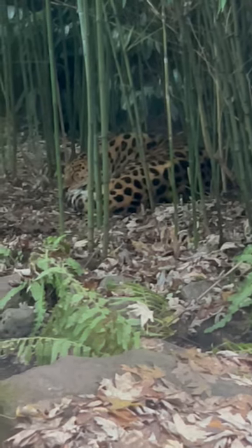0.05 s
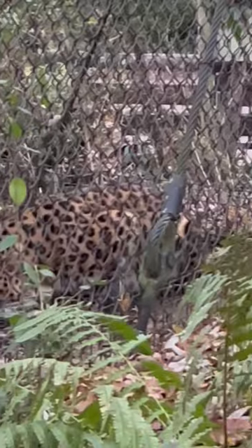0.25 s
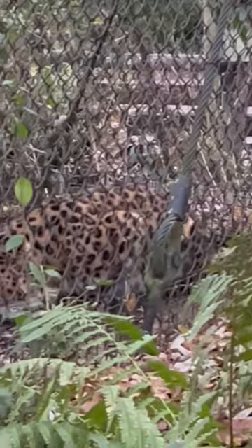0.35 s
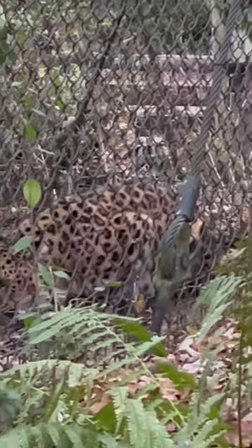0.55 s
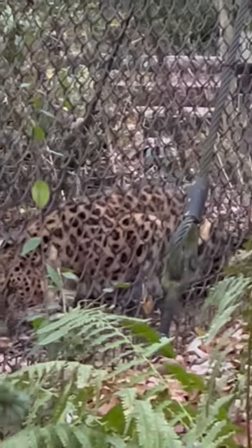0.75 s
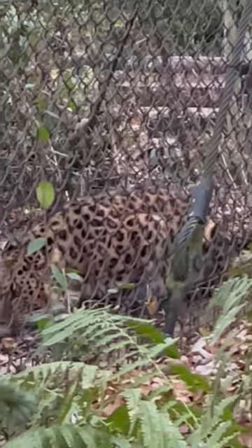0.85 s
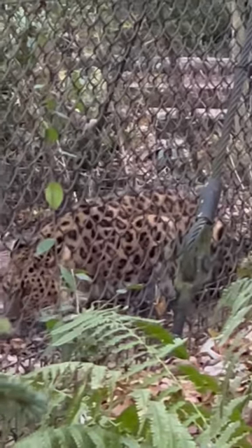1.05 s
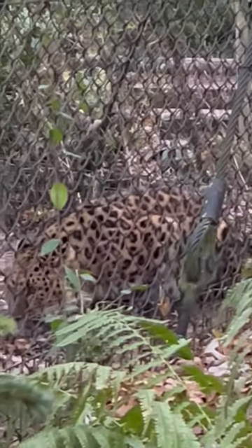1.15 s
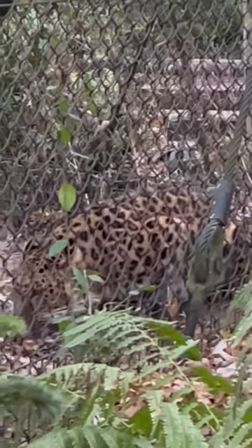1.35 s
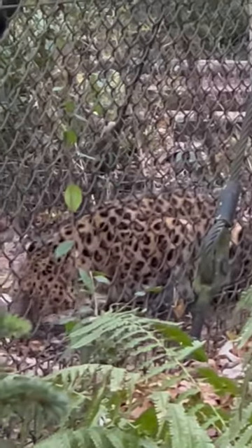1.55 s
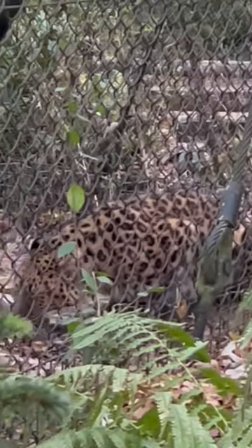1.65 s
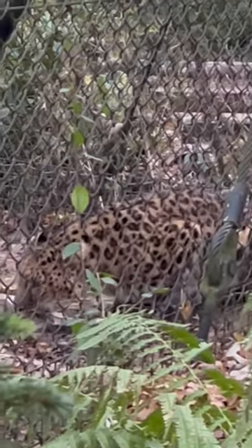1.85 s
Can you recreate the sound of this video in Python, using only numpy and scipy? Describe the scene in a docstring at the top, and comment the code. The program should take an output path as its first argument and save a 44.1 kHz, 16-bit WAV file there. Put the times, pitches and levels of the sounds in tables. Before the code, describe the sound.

A leopard gives three short, low rasps, the last two each led by a softer indrawn one. A small bird to the right sings thin buzzing notes ending in a whistle, over faint outdoor hiss and ticking dry leaves.

```python
"""A faint outdoor hiss and rumble come first, with a far bird's falling chirp and ticking dry leaves.
Then a leopard saws: three low rasps, the last two each led by a softer indrawn rasp. Its slack vocal
folds flap slowly, and each flap excites the resonances of the long throat. A nearer bird in the
trees gives thin notes over a buzz that ends in a slurred whistle."""
import sys
import numpy as np
from scipy import signal
from scipy.fft import rfft, irfft
from scipy.io import wavfile
from scipy.ndimage import uniform_filter1d

SR = 44100
rng = np.random.default_rng(int(sys.argv[2]) if len(sys.argv) > 2 else 0)


def generate_wav(signal):
    """Clip the signal to [-1, 1] and save it as 16-bit WAV at the path in sys.argv[1]."""
    frames = np.transpose(np.atleast_2d(signal))
    scaled = np.clip(frames, -1, 1) * 32767
    pcm = np.round(scaled).astype(np.int16)
    wavfile.write(sys.argv[1], SR, pcm)


N = 83790
T = np.arange(N) / SR
FREQS = np.fft.rfftfreq(N, 1 / SR)


def amp(db):
    """Amplitude ratio of a level; all levels here are relative."""
    return 10 ** (np.asarray(db) / 20)

def unit(x):
    """Normalisation to rms 1."""
    return x / np.sqrt(np.mean(x ** 2) + 1e-20)

def over_frequency(points):
    """Interpolation of (f/Hz, value) points on a logarithmic frequency axis."""
    hz, value = np.transpose(points)
    return np.interp(np.log(FREQS + 1), np.log(hz + 1), value)

def colour(x, gains):
    """Linear filtering by an (f/Hz, gain/dB) curve."""
    return irfft(rfft(x) * amp(over_frequency(gains)), N)

def wander(hz):
    """Random fluctuation: low-pass noise of rms 1."""
    return unit(irfft(rfft(rng.standard_normal(N)) * np.exp(-(FREQS / hz) ** 2), N))


# Coherence between the ears: f/Hz, coherence
COHERENCE = [(50, 1), (200, 0.48), (600, 0.45), (1500, 0.41), (4000, 0.17), (15000, 0.36)]

def outdoor_noise(spectrum):
    """Partial coherence: the ears receive nearly the same noise only at long wavelengths."""
    left, independent = rfft(rng.standard_normal((2, N)))
    coherence = over_frequency(COHERENCE)
    right = coherence * left + np.sqrt(1 - coherence ** 2) * independent
    return unit(colour(irfft(np.array([left, right]), N), spectrum))

# Spectra of the hiss and the rumble: f/Hz, level/dB
HISS_SPECTRUM = [(20, -36), (70, -8), (130, 0), (200, -2), (330, -5), (520, -6.5), (1200, -10.5),
                 (2000, -11), (3100, -8.5), (4200, -12), (6300, -17), (10000, -20.5), (13500, -23),
                 (15700, -29)]
RUMBLE_SPECTRUM = [(15, -22), (35, -22), (55, -6), (85, -4.5), (120, -6), (190, -60), (500, -62)]
# Envelope of the rumble: t/s, level/dB
RUMBLE_ENVELOPE = [(0, -51.5), (.15, -49), (.38, -57.5), (.6, -49), (.95, -61), (1.27, -49.5), (1.7, -63.5),
                   (1.85, -56.5)]

def background():
    """Amplitude-modulated noise: a faint hiss of foliage and an uneven distant rumble."""
    hiss = outdoor_noise(HISS_SPECTRUM) * amp(-44.93 + .5 * wander(6.6) + amp(-15) * wander(120))
    rumble = outdoor_noise(RUMBLE_SPECTRUM) * amp(np.interp(T, *np.transpose(RUMBLE_ENVELOPE)))
    return hiss + rumble


BUZZ_HZ, TRILL_HZ = 100, 160  # modulation rates

def warble(curve, rate_hz, swing_hz, wander_hz):
    """Frequency modulation: a tone shakes quickly about a (t/s, f/Hz, level/dB) curve."""
    times, hz, db = np.transpose(curve)
    shake = np.sin(2 * np.pi * np.cumsum(rate_hz * (1 + .14 * wander(63.3))) / SR)
    pitch = np.interp(T, times, hz) + swing_hz * shake + wander_hz * wander(148.2)
    gate = np.clip(np.minimum(T - times[0], times[-1] - T) / .0043, 0, 1)
    return np.sqrt(2) * gate * amp(np.interp(T, times, db)) * np.sin(2 * np.pi * np.cumsum(pitch) / SR)

def echoes(x, t60):
    """Scattering from stems, fence and ground: an exponential decay, different at each ear."""
    t = T[:SR]
    taps = rng.standard_normal((2, SR)) * (rng.random((2, SR)) < .1)
    taps *= np.exp(-np.log(1000) * t / t60) * np.minimum(t / .0014, 1)
    taps = taps + .21 * taps[::-1]  # the ears share a part
    return signal.fftconvolve(x[None], taps / np.linalg.norm(taps[0]), axes=1)[:, :N]

def tree_echoes(song):
    """Reverberation among the trees, slightly stronger on the right."""
    return echoes(song, t60=.69) * amp([[-.5], [.5]])

# A falling chirp and its hoarse ending: t/s, f/Hz, level/dB
CHIRP_CURVE = [(.055, 4600, -50), (.076, 3800, -45.5), (.092, 3430, -52), (.118, 3220, -49),
               (.16, 3010, -55), (.175, 3030, -63)]
CHURR_CURVE = [(.21, 2400, -58), (.25, 2630, -58), (.278, 2753, -46.5), (.32, 2706, -66)]

def far_bird():
    """Direct-to-reverberant ratio: from far off, the echoes outweigh the call itself."""
    call = warble(CHIRP_CURVE, TRILL_HZ, swing_hz=30, wander_hz=30.3)
    call += warble(CHURR_CURVE, TRILL_HZ, swing_hz=266, wander_hz=143)
    return amp(-8) * call + amp(-1) * tree_echoes(call)


# Ticks of dry leaves: t/s, level/dB
LEAF_TICKS = [(0.148, -56.5), (.366, -57), (.58, -53.5), (0.593, -58), (.851, -53), (1.028, -55),
              (1.243, -52), (1.259, -73), (1.46, -55.5), (1.6, -57.5)]
# Their spectrum: f/Hz, level/dB
LEAF_SPECTRUM = [(1000, -32), (3000, -19), (8000, 11.5), (13000, 6), (15000, 1), (16000, -12)]

def leaves(snap_s=.002, crumple_s=.017):
    """Noise transients with two exponential decays: each leaf snaps and crumples briefly."""
    envelope = np.zeros(N)
    for start, db in LEAF_TICKS:
        age = np.maximum(T - start, 0)
        envelope += (T >= start) * amp(db) * (np.exp(-age / snap_s) + amp(2) * np.exp(-age / crumple_s))
    grain = rng.standard_normal((2, N)) + 2.5 * rng.standard_normal(N)
    return envelope * unit(colour(grain, LEAF_SPECTRUM)) * amp([[-1.5], [3]])


def vocal_folds(flap_times, strength, echo_s, turbulence, puff_s=.0065):
    """Glottal pulse source: each strike of the folds returns as a weaker echo about 4 ms later, and the folds
    release puffs of turbulent air."""
    pulses = np.zeros(N)
    for delay, gain in [(0, 1), (echo_s, amp(-4.5))]:
        pulses[np.clip(((flap_times + delay) * SR).astype(int), 0, N - 1)] += gain * strength
    puff = np.exp(-T[:SR // 20] / puff_s)
    air = signal.fftconvolve(pulses, puff / np.linalg.norm(puff))[:N] * rng.standard_normal(N)
    return (1 - turbulence) * pulses + turbulence * air

def resonate(x, hz, width_hz):
    """Double-pole resonance of gain 1, whose centre frequency can move."""
    carrier = np.exp(2j * np.pi * np.cumsum(hz * np.ones(N)) / SR)
    r = np.exp(-np.pi * width_hz / SR)
    return 2 * (carrier * signal.lfilter([(1 - r) ** 2], [1, -2 * r, r * r], x / carrier + 1e-18)).real

# Upper throat formants, before each rasp scales them: f/Hz, bandwidth/Hz, gain/dB
FORMANTS = [(704.7, 111, -7), (779, 85, -16.5), (1050, 176, -20), (1446, 330, -25.5), (1686, 190, -28),
            (2170, 220, -27.5), (2680, 600, -35)]
# Soft thud under each flap: f/Hz, gain/dB
THUD_SPECTRUM = [(30, -46), (60, -20), (90, -16), (125, -28), (170, 1), (260, -38), (450, 5), (1500, -57)]
REST_HZ, LOW_WIDTH_HZ = 276, 139.4  # the lowest formant, likewise unscaled

def rasp(peak, rise, fall, db, rate, low_hz, upper_db, rise_power, fall_power, alternate_db, push_lag,
         tilt_db, damping, jitter, turbulence):
    """Source-filter principle: a swelling and fading train of slow flaps rings the throat."""
    k = np.arange(-12, 13)  # flaps, counted from the peak
    slip, shimmer, snap, late = rng.standard_normal((4, len(k)))
    spread = 1 + 12 * (k / rate) ** 2  # flaps space out away from the peak
    flap_times = peak + (k + jitter * slip) / rate * spread
    arch = np.sin(np.pi / 2 * np.interp(T, [peak - rise, peak, peak + fall], [0, 1, 0]))
    effort = arch ** np.where(T < peak, rise_power, fall_power)
    strength = np.interp(flap_times, T, effort) * amp(.7 * shimmer - alternate_db * (k % 2))
    # the upper formants grow with the push of air
    bite = (np.interp(flap_times - push_lag, T, effort) + .075) ** .8 * amp(1.5 * snap)
    echo_s = .00388 * REST_HZ / low_hz * (1 + .16 * late)
    low_drive = vocal_folds(flap_times, strength, echo_s, turbulence)
    upper_drive = vocal_folds(flap_times, strength * bite, echo_s, turbulence=.5)
    sag = 1 - .13 * (1 - effort) + .05 * wander(34)  # the lowest formant sinks as effort falls
    voice = resonate(low_drive, low_hz * sag, LOW_WIDTH_HZ * damping)
    voice += amp(-25.5) * colour(low_drive, THUD_SPECTRUM)
    follow = (low_hz / REST_HZ) ** .33  # the upper formants shift a little with the lowest
    for hz, width_hz, gain_db in FORMANTS:
        gain = amp(gain_db + upper_db + tilt_db * np.log2(hz / FORMANTS[0][0]))
        voice += gain * resonate(upper_drive, hz * follow, width_hz * damping)
    peak_rms = np.sqrt(uniform_filter1d(voice ** 2, size=1500).max())
    return amp(db) * voice / peak_rms

# Outward and indrawn rasps: peak t/s, rise/s, fall/s, level/dB, flap rate/Hz, lowest formant f/Hz,
# upper formant gain/dB, rise exponent, fall exponent, weakening of alternate flaps/dB,
# lag of the push of air/s, upper formant tilt/(dB per octave)
OUTWARD_RASPS = [(0.2198, .021, 0.054, -27.5, 89, 284.5, 1.5, .9, 1.64, -1, 0.00088, 1),
                 (.7915, .088, 0.096, -27.5, 61.5, 273.3, 1.5, 1.95, 1.36, 2, -0.0034, -0.8),
                 (1.483, 0.12, 0.059, -28.5, 59, 244.2, -2.5, 1.24, 1, -0.5, -0.0078, 1.5)]
INDRAWN_RASPS = [(.625, 0.21, 0.075, -40, 44.55, 232, -8.5, 2.6, 2.4, 0, 0.0042, 0),
                 (1.2608, 0.19, 0.14, -45, 34.8, 247, -13, 1.5, 1.7, 0, 0, 0.0044)]

def leopard():
    """Phonation on both breaths: the indrawn rasps are more damped and more ragged."""
    voice = sum(rasp(*row, damping=.78, jitter=.035, turbulence=.22) for row in OUTWARD_RASPS)
    voice += sum(rasp(*row, damping=1.2, jitter=.074, turbulence=.35) for row in INDRAWN_RASPS)
    voice = signal.lfilter(*signal.butter(2, 46, "high", fs=SR), voice)  # the head radiates little bass
    return voice * amp([[-.3], [.3]]) + amp(-19.5) * echoes(voice, t60=.51)


# The near bird's buzz and the wide trill around it: t/s, f/Hz, level/dB
BUZZ_CURVE = [(.2, 4535, -59), (.33, 4667, -53), (.42, 4747, -47), (.55, 4780, -51), (.7, 4756, -48),
              (.82, 4680, -45.5), (1.1, 4710, -49.5), (1.21, 4612, -54.5), (1.36, 4520, -49.5),
              (1.55, 4380, -58)]
TRILL_CURVE = [(.2, 4966, -54), (.42, 5266, -50.5), (.66, 5496, -49), (.9, 5320, -50.5), (1.3, 5276, -48),
               (1.5, 5130, -57), (1.56, 5200, -62)]

def bird_buzz():
    """Modulation sidebands: two rapidly shaken tones merge into a throbbing buzz."""
    buzz = warble(BUZZ_CURVE, BUZZ_HZ, swing_hz=155, wander_hz=69.9) * amp(wander(50))
    return buzz + warble(TRILL_CURVE, TRILL_HZ, swing_hz=762, wander_hz=131.1)

# Thin overlapping notes: start t/s, duration/s, f/Hz, glide/Hz, level/dB
BIRD_NOTES = [(0.206, 0.059, 4634, -5, -43.5), (0.24, 0.053, 4840, 8, -40.5), (0.293, 0.045, 4570, 0, -53),
              (.34, 0.099, 5034, 28, -44), (0.401, 0.091, 4940, -170, -41), (0.47, 0.12, 4610, 19.5, -44),
              (0.492, 0.088, 5020, 15, -41), (.585, 0.04, 5020, 4, -39.5), (0.598, 0.054, 4766, 150, -42.5),
              (0.649, 0.083, 5100, 6, -44), (0.755, 0.15, 5076, 19.5, -46), (0.827, .055, 6030, -13, -51),
              (1.035, .035, 4793, 54, -41), (1.158, 0.032, 4600, 11, -47.5), (1.224, 0.029, 4550, 0, -43),
              (1.33, 0.039, 4510, -3, -45), (1.452, 0.096, 5214, -32, -44)]

def bird_notes():
    """Nearly pure tones: each swells and fades along a linear glide."""
    notes = np.zeros(N)
    for start, length, hz, glide, db in BIRD_NOTES:
        curve = [(start, hz, db - 4), (start + length / 2, hz + glide / 2, db),
                 (start + length, hz + glide, db - 4)]
        notes += warble(curve, BUZZ_HZ, swing_hz=0, wander_hz=16)
    return notes

# The closing slur and its hoarse upward flick: t/s, f/Hz, level/dB
SLUR_CURVE = [(1.362, 4930, -53), (1.39, 5190, -43), (1.415, 5220, -39), (1.436, 4994, -38),
              (1.485, 4620, -35), (1.508, 4590, -41), (1.538, 4707, -39.5), (1.555, 4690, -51),
              (1.6, 4770, -51)]
FLICK_CURVE = [(1.556, 5260, -50), (1.578, 6060, -39), (1.588, 6280, -39.5), (1.602, 6570, -36),
               (1.618, 6550, -67)]

def bird_whistle():
    """Frequency glides: a clear slur, then a flick roughened by deeper modulation."""
    slur = warble(SLUR_CURVE, BUZZ_HZ, swing_hz=30, wander_hz=21.7)
    return slur + warble(FLICK_CURVE, TRILL_HZ, swing_hz=70, wander_hz=70.4)

def near_bird(left_lag_s=28e-6):
    """Interaural differences: song from the right reaches the left ear later and weaker."""
    buzz, notes, whistle = bird_buzz(), bird_notes(), bird_whistle()
    direct = amp(-4.5) * buzz + amp(-2) * notes + amp(-2.5) * whistle
    ears = np.array([np.interp(T - left_lag_s, T, direct), direct]) * amp([[-3.5], [2]])
    return ears + tree_echoes(buzz + notes + amp(-4) * whistle)


def scene():
    """Superposition of the sources at the two ears."""
    return background() + far_bird() + leaves() + leopard() + near_bird()

def record(dry):
    """Band limiting: a steep low-pass at 15.7 kHz."""
    low_pass = signal.firwin(511, 15700, window=("kaiser", 9), fs=SR)
    return signal.oaconvolve(dry, low_pass[None], "same")


dry = scene()
out = record(dry)
generate_wav(out)
```